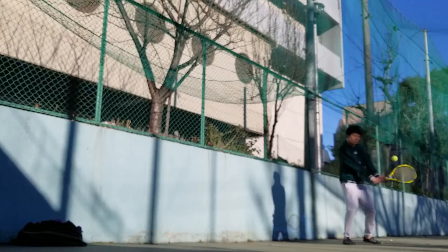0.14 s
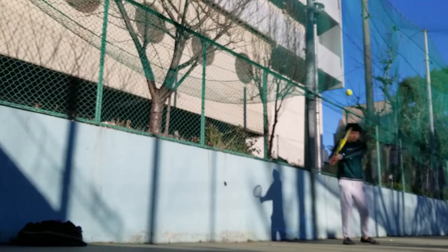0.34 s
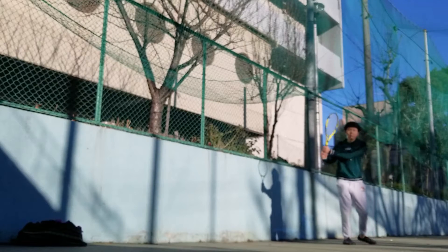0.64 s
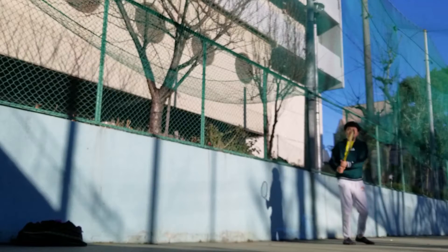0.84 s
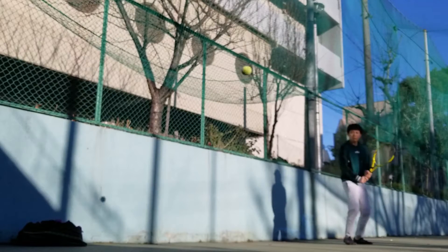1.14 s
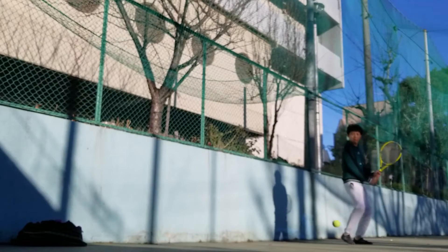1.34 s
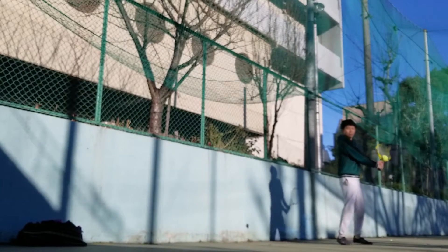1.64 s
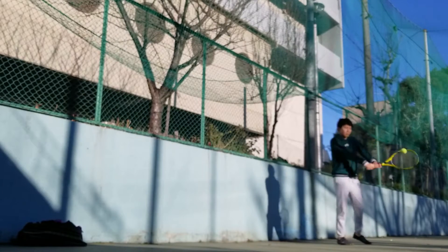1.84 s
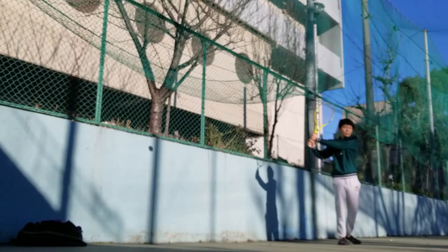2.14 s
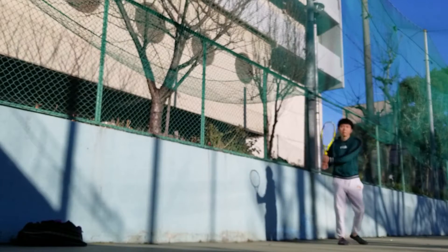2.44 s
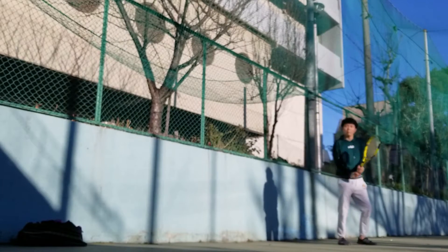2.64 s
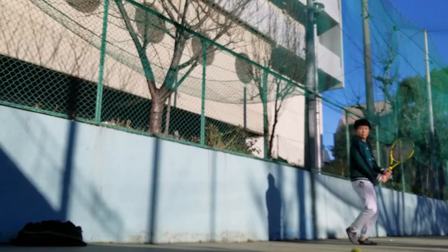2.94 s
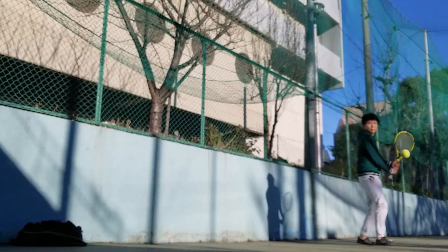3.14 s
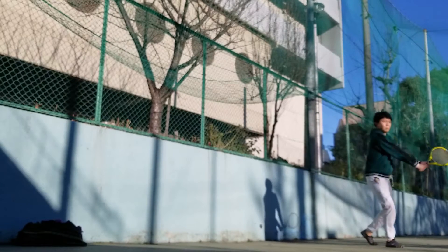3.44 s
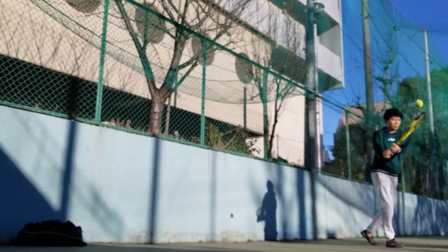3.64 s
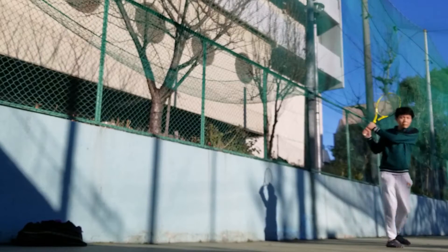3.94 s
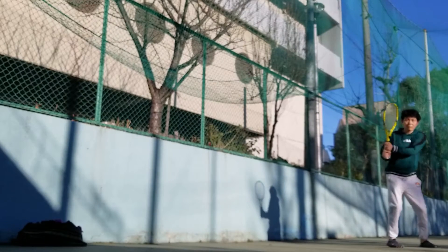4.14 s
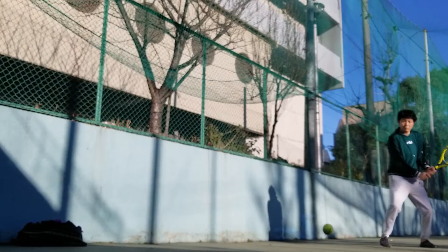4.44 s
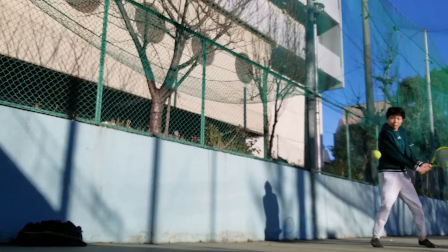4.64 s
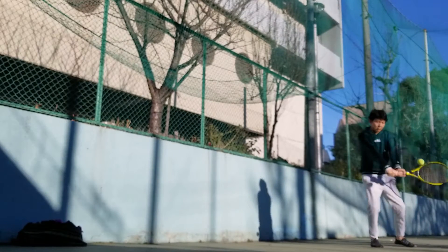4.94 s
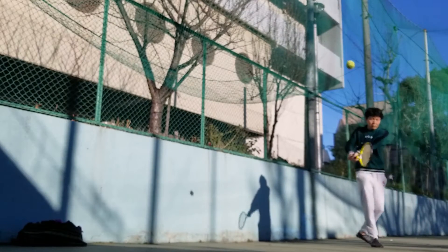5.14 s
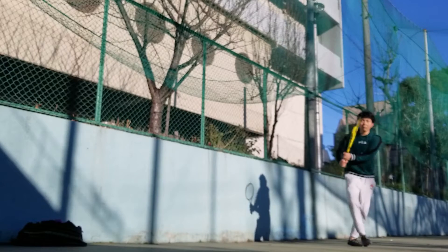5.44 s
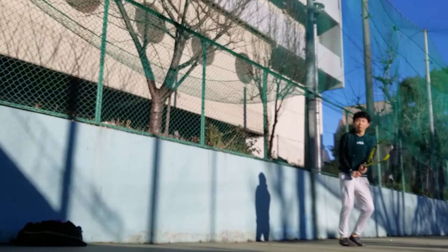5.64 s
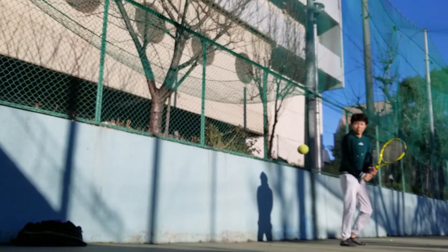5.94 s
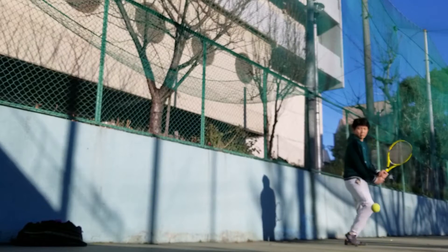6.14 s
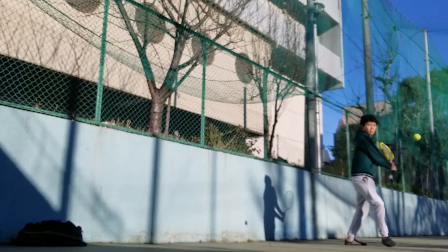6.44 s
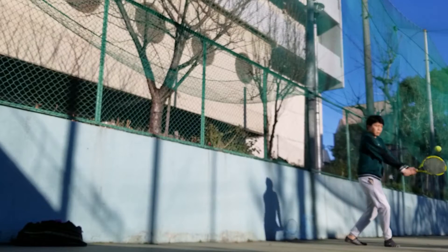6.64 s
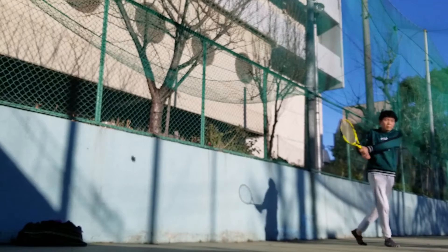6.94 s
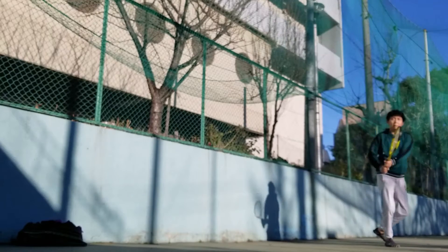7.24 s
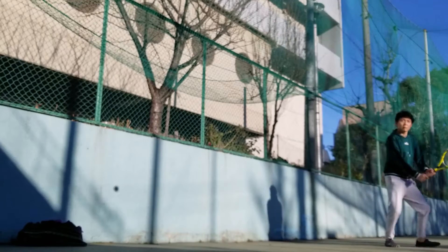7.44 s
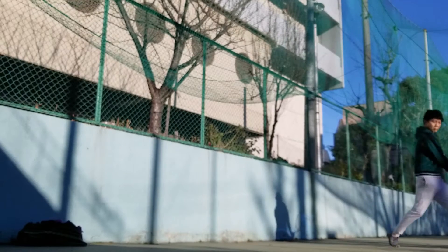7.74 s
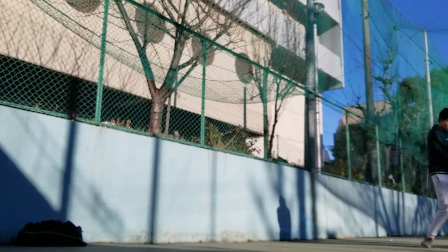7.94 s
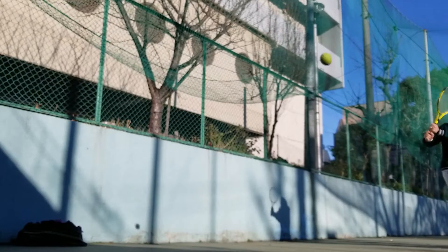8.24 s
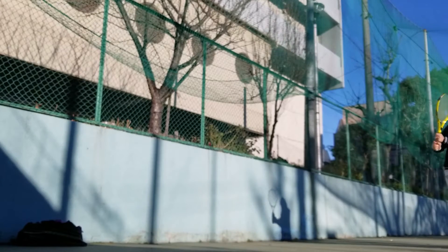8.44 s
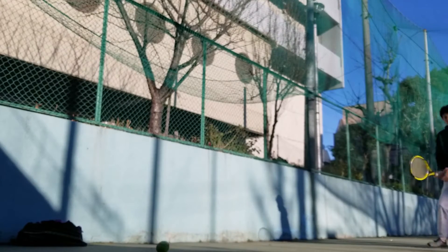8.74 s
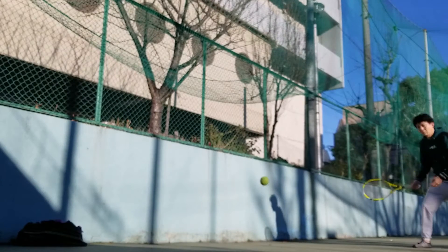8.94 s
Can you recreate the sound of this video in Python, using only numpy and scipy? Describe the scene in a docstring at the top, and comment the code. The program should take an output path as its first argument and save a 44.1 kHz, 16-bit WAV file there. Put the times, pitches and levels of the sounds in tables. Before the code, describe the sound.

Outdoor tennis wall practice, heard close to the wall at ground level. Six loud, dry pops on concrete dominate, each preceded by a much quieter hollow racket ping and followed by a light low tap of the ball on the court. Grainy shoe slides and brief footfalls come between. The surrounding walls give a short slapping echo and tail over a low, steady town rumble.

```python
"""The ping of racket strings comes first, over the low rumble of a town; then a ball pops loudly on a concrete wall.
Someone practises tennis in a yard between buildings, heard from the ground near the wall.
Strings ring as fading tones, the wall adds a crack, a thump and a shell ring, and the court a light gritty tap.
Shoes on the gritty court make grainy noise, in long slides and a few brief footfalls.
The buildings echo, and the town is shaped noise behind it all."""
import sys
import numpy as np
from scipy import signal
from scipy.fft import rfft, irfft, next_fast_len
from scipy.io import wavfile
from scipy.ndimage import map_coordinates

SR = 44100
rng = np.random.default_rng(int(sys.argv[2]) if len(sys.argv) > 2 else 0)


def unload_wav(signal):
    """Save mono or channel-first audio to the path in sys.argv[1] as 16-bit WAV at rate SR, clipped to [-1, 1]."""
    wavfile.write(
        sys.argv[1],
        SR,
        np.round(np.clip(np.atleast_2d(signal).T, -1, 1) * 32767).astype(np.int16),
    )


N = 399987
T = np.arange(SR // 2) / SR  # time since a blow, in seconds

# distant traffic colour: f/Hz, level/dB
TOWN = [(13, -37), (22, -20), (64, 1.5), (205, -13), (229, -14.5), (302, -12), (337, -18.5), (432, -17.5),
        (861, -25), (935, -26), (2320, -45), (7190, -69), (16000, -59)]
# how alike left and right are in a diffuse sound: f/Hz, likeness/0-1
ALIKE = [(60, 1), (150, 0.93), (380, 0.69), (900, 0.05), (3000, 0.059), (15000, 0.17)]
# flat walls around the yard: delay t/s, level/dB before the echo setting and colour
ECHOES = [(0.0729, -23), (0.0981, -29), (0.157, -29)]
# time the yard's tail takes to fall by 60 dB: f/Hz, t/s
YARD_T60 = [(100, 0.3), (300, 2.1), (1000, 6.3), (2500, 1.37), (4500, 0.67), (8000, 0.27), (15000, 0.39)]
# colour of the yard's tail: f/Hz, level/dB
YARD_COLOUR = [(80, -36), (300, -1), (700, -17), (2500, 2.5), (8000, 4), (15000, 2)]
# colour of the scattered return from a far facade: f/Hz, level/dB
FACADE_COLOUR = [(200, -10), (700, -5.5), (1400, -4), (2300, 2), (3300, -6), (12000, -24)]
# colour of small reflectors: f/Hz, level/dB
POST_COLOUR = [(100, -7.5), (400, 0.5), (1000, -2), (3000, 1.5), (4500, -9), (12000, -9.5)]
# colour of the echoes off flat walls: f/Hz, level/dB
ECHO_COLOUR = [(100, -5), (400, 2.5), (1000, -18.5), (3000, 3.5), (5000, -4.5), (12000, 0)]
# shoes on grit, long slides and a few brief footfalls:
#   peak t/s, length t/s, scrape level/dB, fizz level/dB over the scrape
SHOE_MOVES = [(0.872, 0.3, -66.5, -6), (1.89, 0.1, -57.5, -2), (2.366, 0.22, -59, -2.5),
              (2.513, .16, -49, -5), (3.262, 0.031, -54.5, -20), (4.09, 0.062, -48, 0),
              (4.88, 0.29, -72.5, -6), (5.606, 0.062, -53.5, -4.5), (6.181, .007, -58.5, -22),
              (6.577, 0.089, -73, -11), (7.563, .2, -71, -10), (7.923, 0.14, -53.5, -0.5),
              (8.661, 0.067, -60, -10)]
# colour of soles scraping: f/Hz, level/dB per Hz
SCRAPE = [(800, -1), (2500, 0.5), (4000, 0), (6000, -2.5), (7700, 0.5), (9000, -16), (16000, -14)]
# colour of fine fizzing grit: f/Hz, level/dB per Hz
FIZZ = [(3000, -18), (7000, -17), (10000, 4), (15500, 6)]
# ball on the court: t/s, strength level/dB, lag of the practice wall's mirror image t/ms,
#   grit level/dB over the strength
COURT = [(1.3793, -35.5, 11.4, -14), (2.9425, -35, 14.5, -9), (4.4033, -37, 14.5, -19.5),
         (6.0738, -38.5, 13.3, -20), (7.7979, -37, 14.5, -14.5), (8.7525, -36.5, 12, -18)]
# colour of the tap on the court: f/Hz, level/dB per Hz
COURT_CRACK = [(100, -17.5), (500, 1.5), (1000, 4.5), (2400, -1.5), (3400, -16.5), (7000, -38),
               (10000, -60), (16000, -55)]
# colour of the grit in a bounce: f/Hz, level/dB per Hz
BOUNCE_GRIT = [(1000, -10), (3000, 1), (5000, -0.5), (7500, -2.5), (9500, -15), (15500, -14)]
# strokes: t/s, strength level/dB, distance from the sweet spot/0-1, scrape of the pivoting foot level/dB
RACKET = [(0.2205, -36, 1, -57), (1.879, -37.5, 0.33, -62.5), (3.557, -33.5, 0, -66),
          (4.992, -43, 0.22, -72), (6.712, -36, 0.58, -70), (8.0095, -36.5, 0.13, -67)]
# string bed modes: f/Hz, relative level/dB, 60 dB decay t/s, level/dB gained far from the sweet spot
STRINGS = [(548, -7.5, 0.38, -4.5), (860, -3, 0.22, 3.5), (1036, 16, 0.047, -12), (1413, -1.5, 0.1, 14),
           (1600, -10, 0.23, -4), (1810, -32, .2, -13), (1840, -18, 0.37, 6.5), (1965, -2, 0.16, -24),
           (2550, -16, 0.15, 11), (2540, -9, 0.13, -6), (2610, -16, 0.079, 10), (3680, -15, 0.11, -17)]
# colour of the noise in a stroke: f/Hz, level/dB per Hz
RACKET_CRACK = [(100, -40), (400, -4), (650, 2), (1300, -1), (2000, -13.5), (3000, -23.5), (8000, -35),
                (16000, -68.5)]
# colour of felt brushing the strings: f/Hz, level/dB per Hz
BRUSH = [(1000, -24), (3000, -13.5), (5000, -4), (7700, 2), (9000, -8), (15500, -9)]
# ball on the wall: t/s, strength level/dB, shell f/Hz, ground reflection lag t/ms, side wall lag t/ms,
#   then level/dB over the strength for shell ring, metallic ring and grit
WALL = [(0.7841, -11, 1180, 0.83, 13.9, -19, -27, -57), (2.464, -11.5, 1130, 0.77, 14.7, -18, -19, -39),
        (4.0256, -8, 1110, 0.675, 16.2, -19.5, -27, -40), (5.5322, -13, 1166, 0.78, 15, -18.5, -26, -45),
        (7.1619, -9, 1070, 0.825, 17.6, -11, -27.5, -37), (8.4801, -6.5, 1140, 0.47, 16.3, -19, -25.5, -53)]
# colour of the crack on the concrete: f/Hz, level/dB per Hz
WALL_CRACK = [(100, -23), (500, -14), (1200, 19), (2000, 5), (2800, -2), (3600, -4), (5500, -11.5),
              (8000, -18), (10000, -41), (16000, -43)]
# something metal by the wall: f/Hz, relative level/dB, 60 dB decay t/s
METAL = [(4080, 9, 0.13), (4100, 2, 0.28), (4170, 2, 0.093), (6840, 2, .04), (9000, -14, 0.037)]

BRUSH_DB = -43  # felt brushing the strings, the same at every stroke
PIVOT_AFTER_S, PIVOT_LENGTH_S = 0.12, 0.16  # the foot turns during each follow-through
RISE_SHARE = 0.54  # part of a shoe sound spent swelling
# a pivot this loud fizzes as much as it scrapes; dB of fizz lost per dB below
PIVOT_FIZZ_FROM_DB, PIVOT_FIZZ_GROWS = -56.5, 1.5
TAP_DB, TAP_THUMP_DB, FELT_DB = -2, 0, 1.5  # parts of a bounce, over its strength
PING_DB, BED_THUMP_DB, BED_CRACK_DB = 1.5, 6, 6  # parts of a stroke, over its strength
CRACK_DB, THUMP_DB, KNOCK_DB = -11, -3.5, -30.5  # parts of the pop, over its strength
# a harder blow flattens the ball faster, so it thumps higher: pitch of a usual blow, growth per dB
USUAL_BLOW_DB, THUMP_HZ, THUMP_RISE_PER_DB = -10, 262.5, 0.04
# the wall lies to the left: lag of the right microphone, and its level over the left
WALL_PORT_MS, WALL_RIGHT_DB = 0.353, 3.0
METAL_WIDTH_HZ = 50  # how far the metal's modes waver
TOP_HZ = 16200  # nothing is kept from here up


def amp(db):
    """Decibels to gain."""
    return 10 ** (np.asarray(db) / 20)


def unit(x):
    """Scaled to rms 1."""
    return x / np.sqrt(np.mean(x ** 2) + 1e-20)


def burst(x):
    """Scaled to the energy of 10 ms at rms 1."""
    energy = np.mean(np.sum(x ** 2, axis=-1))
    return x / np.sqrt(energy / (SR / 100) + 1e-20)


def along(points, hz):
    """Values of an (f/Hz, value) table, read on a log frequency axis."""
    f, v = np.transpose(points)
    return np.interp(np.log(hz + 1), np.log(f + 1), v)


def filtered(x, response):
    """x times a complex response of frequency."""
    n = x.shape[-1]
    m = next_fast_len(n + SR // 4)
    hz = np.fft.rfftfreq(m, 1 / SR)
    return irfft(rfft(x, m) * response(hz), m)[..., :n]


def coloured(x, spectrum):
    """x with an (f/Hz, level/dB) colour."""
    return filtered(x, lambda hz: amp(along(spectrum, hz)))


def delayed(x, s):
    """x arriving s seconds later."""
    return filtered(x, lambda hz: np.exp(-2j * np.pi * hz * s))


def click(spectrum):
    """The most compact pulse with this colour that starts at once (minimum phase)."""
    hz = np.fft.rfftfreq(len(T), 1 / SR)
    cepstrum = irfft(np.log(amp(along(spectrum, hz))))
    # folding the second half onto the first puts the energy at the start
    cepstrum[1:len(T) // 2] *= 2
    cepstrum[len(T) // 2 + 1:] = 0
    return burst(irfft(np.exp(rfft(cepstrum))))


def puff(spectrum, t60, rise_s):
    """Stereo noise that swells quickly and dies away."""
    envelope = amp(-60 * T / t60) * (1 - np.exp(-T / rise_s))
    noise = coloured(rng.standard_normal((2, len(T))), spectrum)
    return burst(noise * envelope)


def ring(hz, t60, phase=0):
    """One decaying mode: a pure tone that falls by 60 dB in t60 seconds."""
    return np.sin(2 * np.pi * hz * T + phase) * amp(-60 * T / t60)


def rattle(hz, t60, width_hz):
    """A loosely held mode: its strength and phase waver as it dies."""
    band = filtered(rng.standard_normal(len(T)), lambda f: 1 / (1 + ((f - hz) / width_hz) ** 4))
    return unit(band) * amp(-60 * T / t60)


def thump(hz, crest_s, centre_s, width_s):
    """Air moved by the ball as it flattens and springs back: a few swings of a low wave."""
    envelope = np.exp(-((T - centre_s) / width_s) ** 2) * (1 - np.exp(-T / 0.000067))
    return burst(np.cos(2 * np.pi * hz * (T - crest_s)) * envelope)


def wobble(rate):
    """A smooth random curve with rate knots a second."""
    knots = rng.standard_normal(int(N * rate / SR) + 4)
    return map_coordinates(knots, [np.arange(N) * rate / SR])


def ports(x, lag_ms, right_db):
    """A sound reaching two microphones: the right one is late by lag_ms and louder by right_db."""
    left = x * amp(-right_db / 2)
    right = delayed(x, lag_ms / 1000) * amp(right_db / 2)
    return np.array([left, right])


def spread(pair):
    """Two unrelated noises become a diffuse field: alike in the bass, apart in the treble."""
    def mix(hz):
        turn = np.arccos(np.clip(along(ALIKE, hz), 0, 1)) / 2
        return np.array([np.cos(turn), np.sin(turn)])

    mid, side = filtered(pair, mix)
    return np.array([mid + side, mid - side])


def add(track, s, x):
    """Mix x into the track at s seconds."""
    start = round(s * SR)
    part = x[:, :N - start]
    track[:, start:start + part.shape[1]] += part


def yard(x, near_db, ragged_db, tail_db, facade_db, echo_db):
    """The yard's answer to a sound: close scatter, slap echoes, ragged returns, a far facade and a long tail."""
    # the tail is noise in which each pitch dies at its own pace
    hz, t, z = signal.stft(rng.standard_normal((2, SR * 3 // 2)), SR, nperseg=256)
    decay = amp(-60 * t / along(YARD_T60, hz)[:, None])
    tail = signal.istft(z * decay, SR, nperseg=256)[1]
    t = np.arange(tail.shape[1]) / SR
    near = rng.standard_normal(tail.shape) * amp(-60 * t / 0.14) * (1 - np.exp(-t / 0.0074))
    # posts and balconies each send back one small copy
    hits = rng.random(len(t)) < 240 / SR
    posts = hits * rng.standard_normal(len(t)) * (t > .06) * amp(-60 * t / 0.79)
    posts = ports(coloured(posts, POST_COLOUR), lag_ms=0.28, right_db=9.0)
    facade = coloured(rng.standard_normal(tail.shape), FACADE_COLOUR)
    facade = facade * np.exp(-((t - .198) / 0.019) ** 2)
    layers = (coloured(tail, YARD_COLOUR), tail_db), (near, near_db), (facade, facade_db)
    answer = spread(sum(amp(db) * part / np.linalg.norm(part[0]) for part, db in layers))
    answer += amp(ragged_db) * posts / np.linalg.norm(posts[0])
    slaps = np.zeros(len(t))
    for s, db in ECHOES:
        slaps[round(s * SR)] = amp(db + echo_db)
    answer += coloured(slaps, ECHO_COLOUR)
    return signal.fftconvolve(x[None], answer, axes=1)


def town():
    """Distant traffic: a slowly swelling rumble of noise with a low engine drone in it."""
    traffic = unit(spread(coloured(rng.standard_normal((2, N)), TOWN)))
    drone = unit(filtered(rng.standard_normal(N), lambda hz: np.exp(-((hz - 62) / 9) ** 2)))
    swell = amp(.6 * wobble(3))
    rumble = amp(-41.5) * swell * traffic + amp(-52.5) * drone
    return rumble * amp([[-.5], [.5]])


def shoes():
    """Soles press and drag on loose grit: a grainy scrape that the yard returns, and a fine fizz on top."""
    t = np.arange(N) / SR
    pivots = []
    for s, _, _, db in RACKET:
        fizz_db = PIVOT_FIZZ_GROWS * (db - PIVOT_FIZZ_FROM_DB)
        pivots.append((s + PIVOT_AFTER_S, PIVOT_LENGTH_S, db, fizz_db))
    power, fizz_power = np.zeros(N), np.zeros(N)
    for s, length, db, fizz_db in [*SHOE_MOVES, *pivots]:
        side_s = length * np.where(t < s, RISE_SHARE, 1 - RISE_SHARE)
        swell = np.exp(-np.abs((t - s) / side_s) ** 1.7)
        power += (amp(db) * swell) ** 2
        fizz_power += (amp(db + fizz_db) * swell) ** 2
    grains = amp(1.7 * wobble(440) + 1.6 * wobble(40))

    def sand(spectrum):
        return unit(coloured(grains * rng.standard_normal((2, N)), spectrum))

    scrape = np.sqrt(power) * sand(SCRAPE)
    fizz = np.sqrt(fizz_power) * sand(FIZZ)
    answer = yard(scrape[0], near_db=-15, ragged_db=-16.5, tail_db=-11, facade_db=-16.5, echo_db=3)
    return (scrape + fizz) * amp([[-1], [1]]) + answer[:, :N]


def court_bounces():
    """A light gritty tap at contact and another at release, mirrored by the practice wall."""
    track = np.zeros((2, N))
    for s, db, mirror_ms, grit_db in COURT:
        crack = -amp(TAP_DB) * click(COURT_CRACK)
        release = 0.22 * delayed(crack, 0.002935)
        body = amp(TAP_THUMP_DB) * thump(273, crest_s=0.0025, centre_s=0.0026, width_s=0.0045)
        felt = amp(FELT_DB) * puff(COURT_CRACK, t60=0.017, rise_s=0.00045)
        grit = amp(grit_db) * puff(BOUNCE_GRIT, t60=0.013, rise_s=0.00024)
        tap = ports(crack + release + body, lag_ms=0.14, right_db=9.0)
        tap = tap + felt + grit + 0.73 * delayed(grit, 0.0033)
        mirror = delayed(tap, mirror_ms / 1000)
        add(track, s, amp(db) * (tap + amp(-8.0) * mirror))
        answer = yard(crack + body + grit[0], near_db=-9.0, ragged_db=-17.5, tail_db=-11.5,
                      facade_db=-22.0, echo_db=-8)
        add(track, s, amp(db) * answer)
    return track


def racket_hits():
    """The ball thumps into the string bed; its distance from the sweet spot shifts which modes ping."""
    track = np.zeros((2, N))
    for s, db, off_centre, _ in RACKET:
        ping = np.zeros(len(T))
        for hz, level, t60, edge_db in STRINGS:
            # each mode varies a little in level and starts at a random phase
            level_chance, phase_chance = rng.standard_normal(2)
            gain = amp(level + edge_db * off_centre + level_chance)
            ping += gain * ring(hz, t60, np.pi * phase_chance)
        ping = amp(db + PING_DB) * burst(ping * (1 - np.exp(-T / 0.016)))
        body = amp(db + BED_THUMP_DB) * thump(282, crest_s=0.002, centre_s=0.0045, width_s=0.0035)
        crack = amp(db + BED_CRACK_DB) * puff(RACKET_CRACK, t60=0.076, rise_s=0.0055)
        noise = crack + amp(BRUSH_DB) * puff(BRUSH, t60=0.08, rise_s=0.0013)
        add(track, s, ports(ping + body, lag_ms=0.044, right_db=5.5) + noise * amp([[-2], [2]]))
        answer = yard(.6 * ping + body + noise[0], near_db=-33, ragged_db=-20.5, tail_db=-8.0,
                      facade_db=-19.0, echo_db=-9.0)
        add(track, s, answer)
    return track


def wall_hits():
    """The ball cracks on the concrete and thumps; its shell rings at contact and again at release."""
    track = np.zeros((2, N))
    for s, db, shell_hz, ground_ms, side_ms, shell_db, metal_db, grit_db in WALL:
        thump_hz = THUMP_HZ * np.exp(THUMP_RISE_PER_DB * (db - USUAL_BLOW_DB))
        crack = -amp(CRACK_DB) * click(WALL_CRACK)
        body = amp(THUMP_DB) * thump(thump_hz, crest_s=0.0019, centre_s=0.0028, width_s=0.0017)
        contact = burst(ring(shell_hz, 0.011))
        release = burst(ring(shell_hz, 0.0074) * (1 - np.exp(-(T / 0.00059) ** 2)))
        shell = amp(shell_db) * (delayed(release, 0.00431) - contact)
        knock = -amp(KNOCK_DB) * burst(ring(1860, 0.0053) * (1 - np.exp(-T / 0.00014)))
        ground = .7 * delayed(crack + shell, ground_ms / 1000)
        grit = amp(grit_db) * puff(FIZZ, t60=0.013, rise_s=0.00013)[0]
        # a side wall returns the pop, and a thin metallic ring hangs on
        slap = delayed(amp(-12.5) * body + amp(-11) * crack + grit, side_ms / 1000)
        modes = [amp(level) * rattle(hz, t60, METAL_WIDTH_HZ) for hz, level, t60 in METAL]
        metal = amp(metal_db) * burst(sum(modes))
        pop = body + crack + ground + grit + shell + knock + slap + metal
        add(track, s, amp(db) * ports(pop, lag_ms=WALL_PORT_MS, right_db=WALL_RIGHT_DB))
        answer = yard(body + crack + shell + knock, near_db=-21.0, ragged_db=-31, tail_db=-21.5,
                      facade_db=-27.5, echo_db=1.5)
        add(track, s, amp(db) * answer)
    return track


def scene():
    """The town, the footwork and the rally."""
    return town() + shoes() + court_bounces() + racket_hits() + wall_hits()


def record(dry):
    """Rounds the highest peaks, drops the deepest bass and keeps nothing from the band limit up."""
    held = dry / (1 + np.abs(dry / .95) ** 8) ** (1 / 8)
    return filtered(held, lambda hz: (hz < TOP_HZ) * hz ** 2 / np.hypot(hz ** 2, 28 ** 2))


dry = scene()
out = record(dry)
unload_wav(out)
```